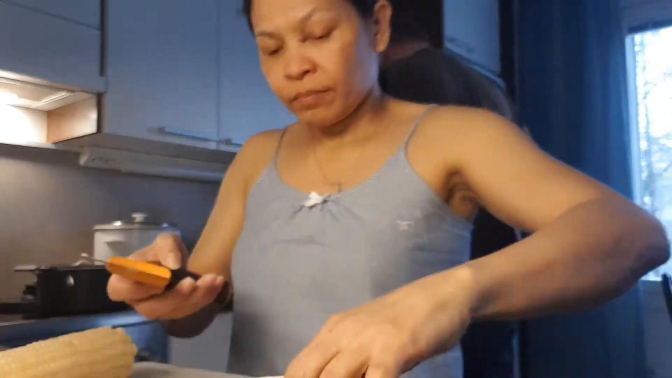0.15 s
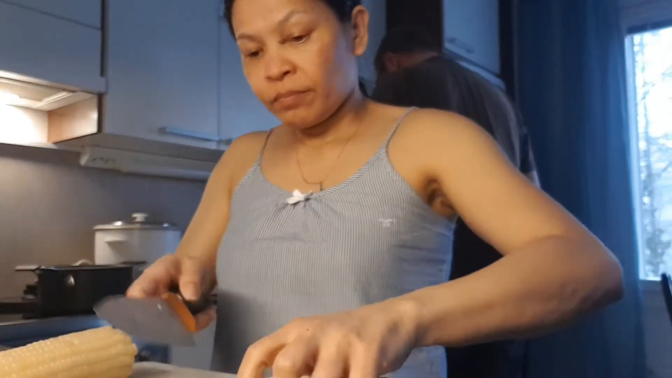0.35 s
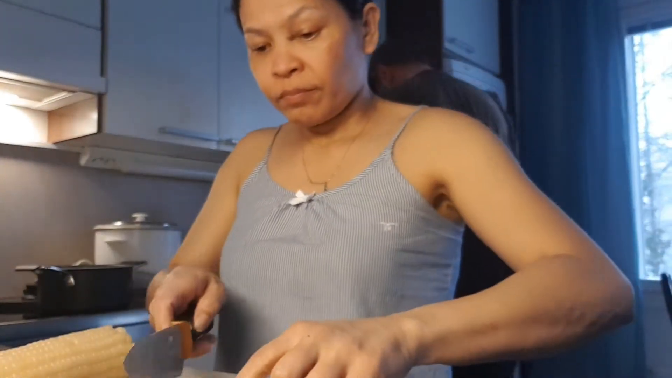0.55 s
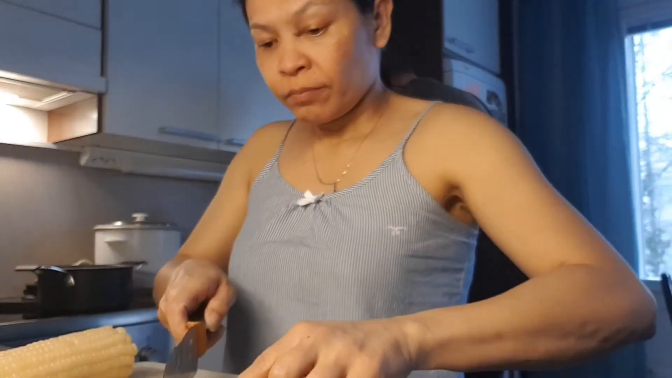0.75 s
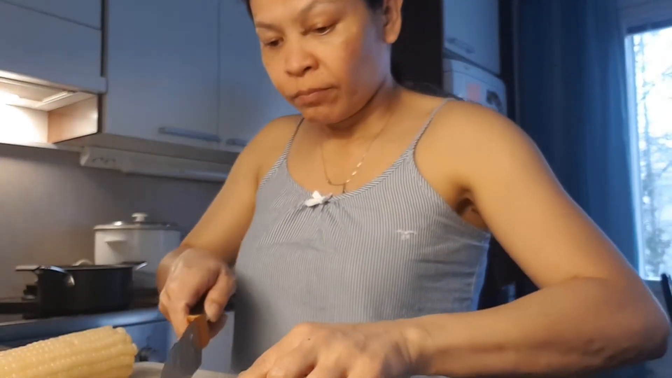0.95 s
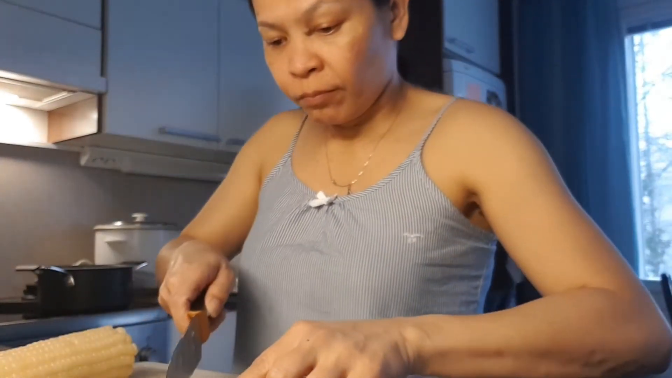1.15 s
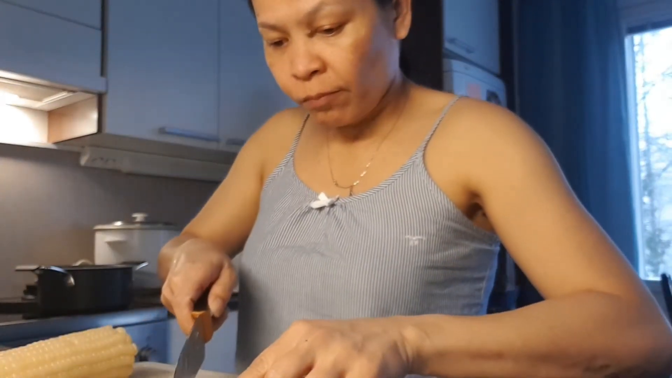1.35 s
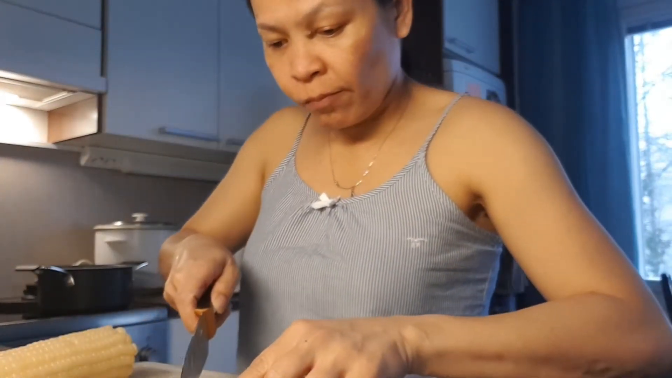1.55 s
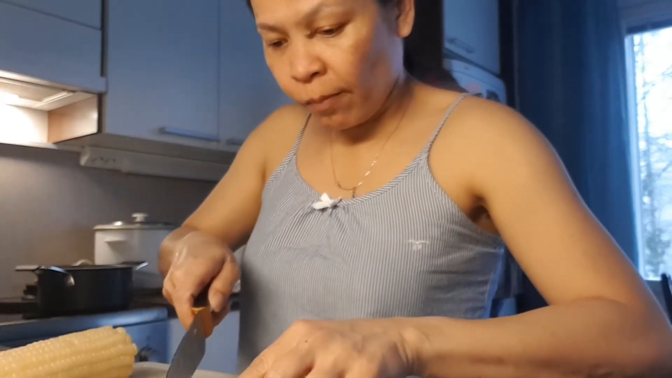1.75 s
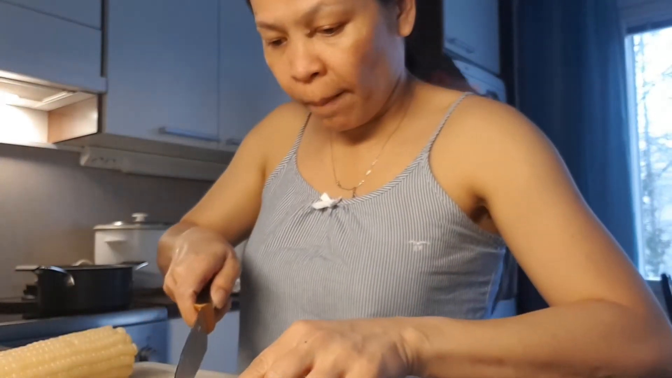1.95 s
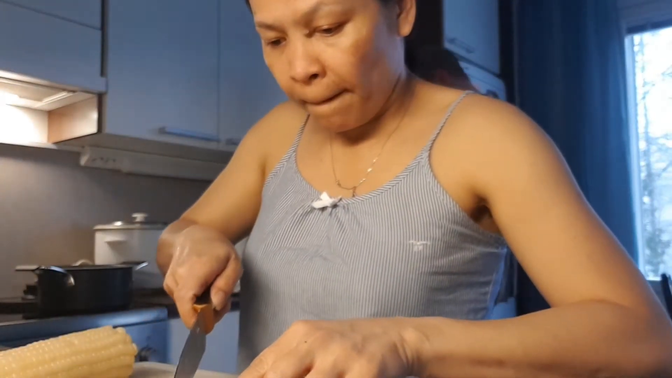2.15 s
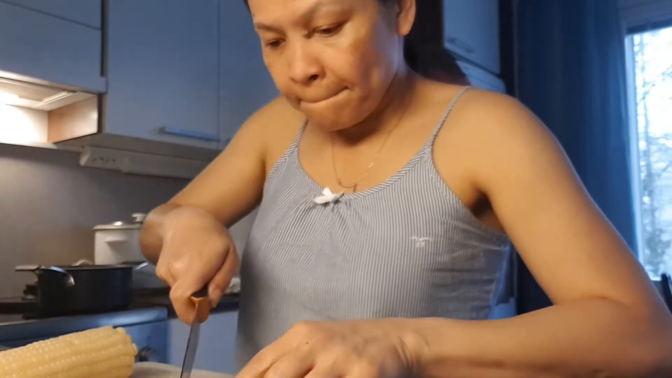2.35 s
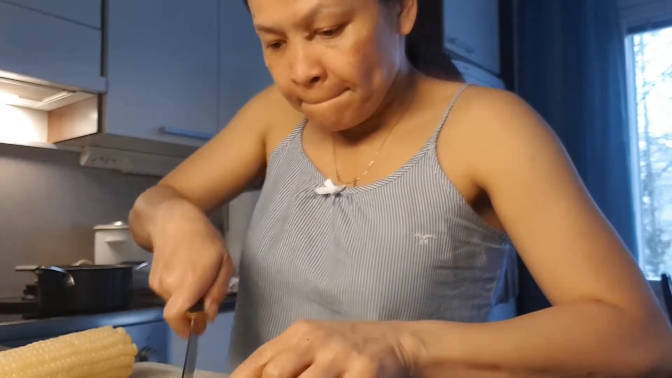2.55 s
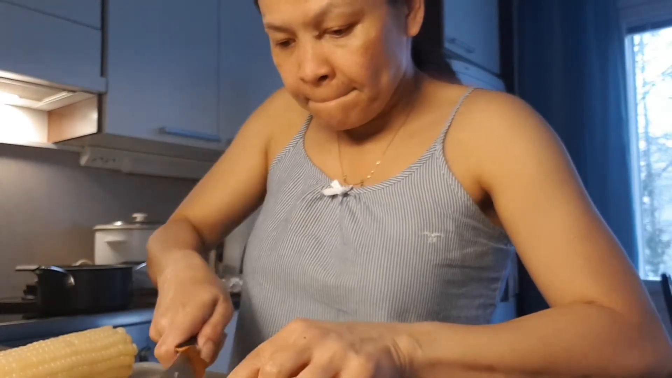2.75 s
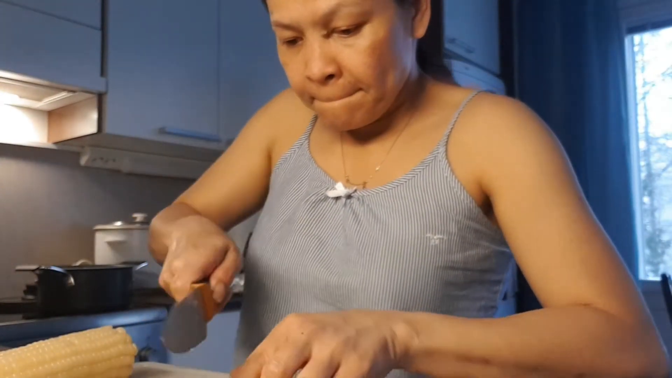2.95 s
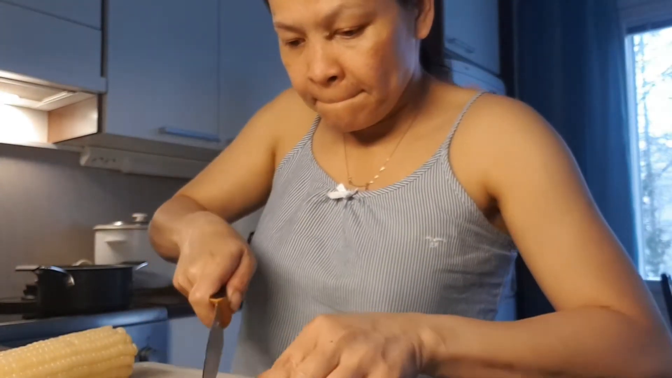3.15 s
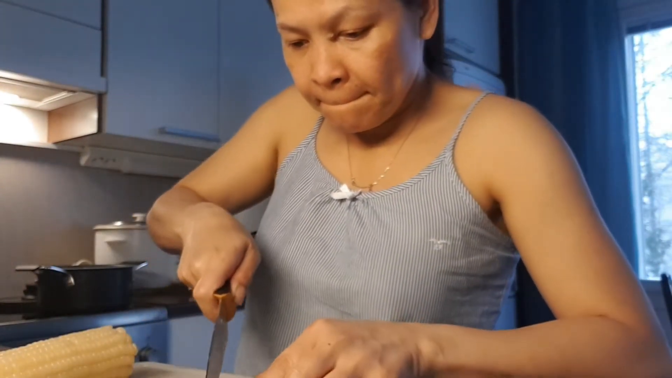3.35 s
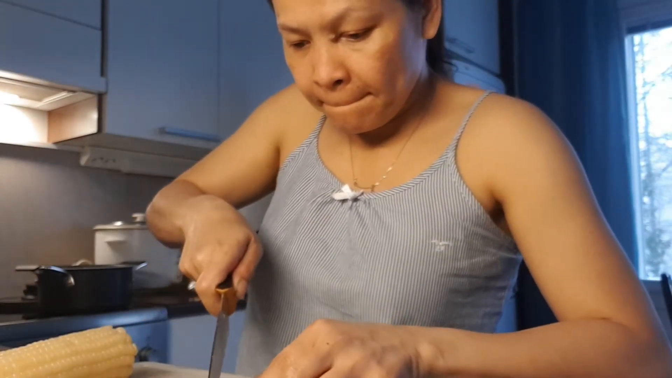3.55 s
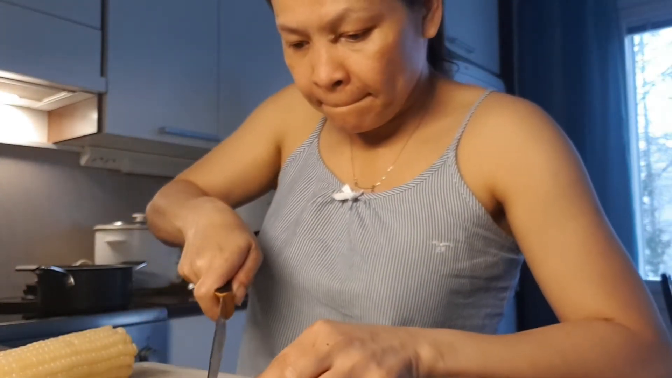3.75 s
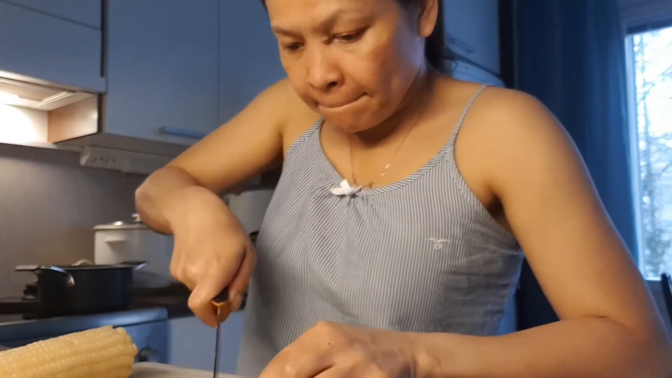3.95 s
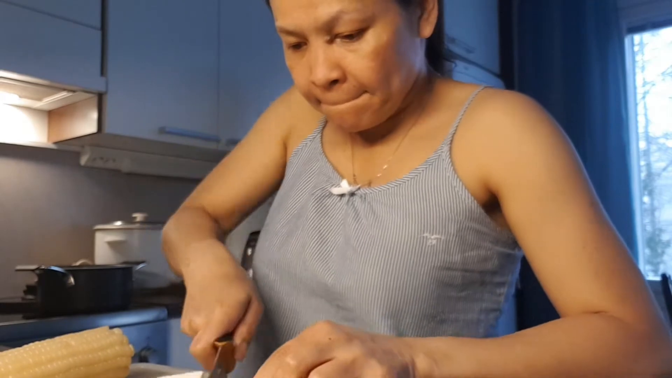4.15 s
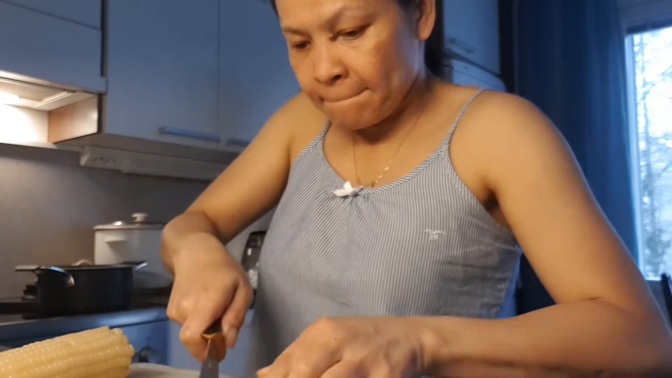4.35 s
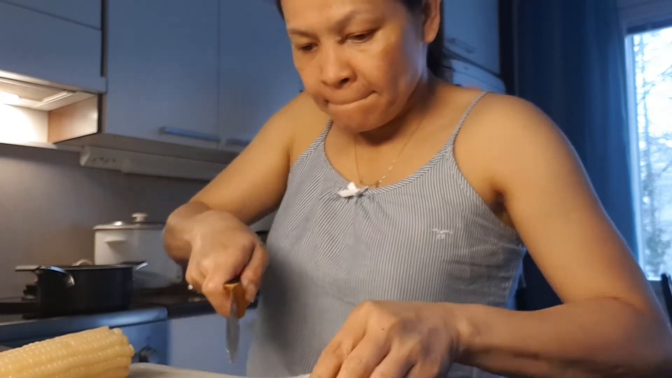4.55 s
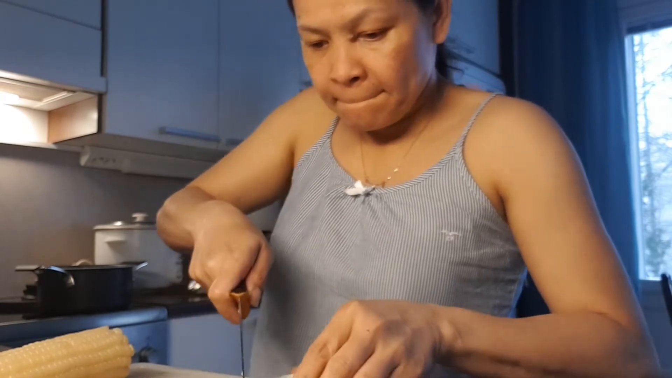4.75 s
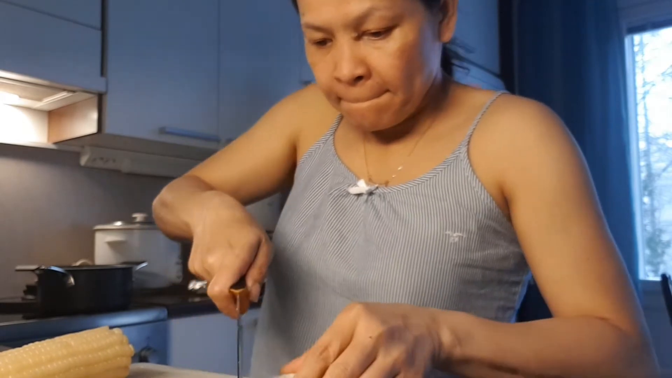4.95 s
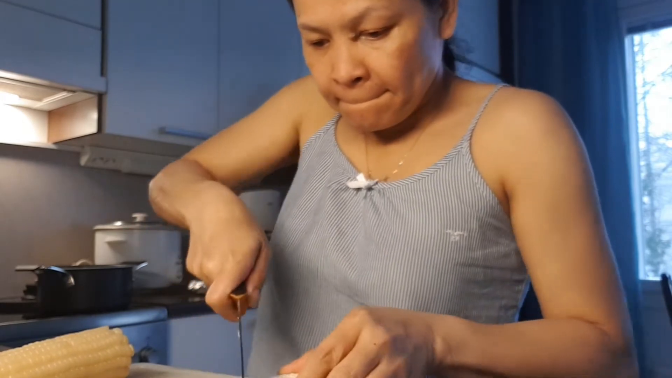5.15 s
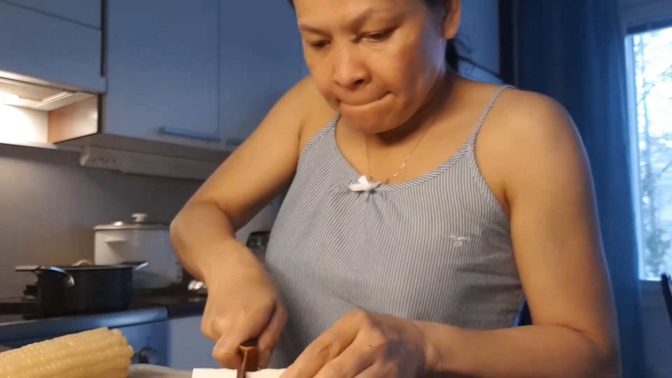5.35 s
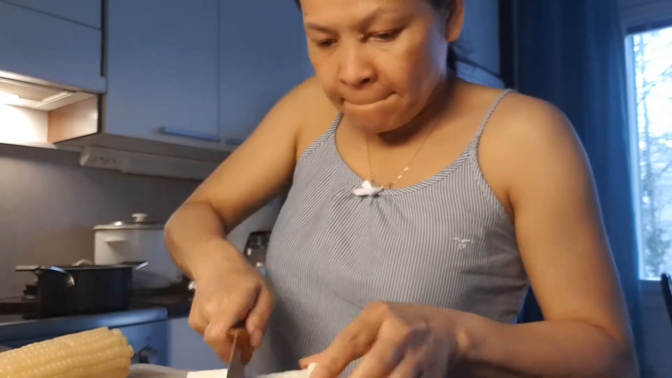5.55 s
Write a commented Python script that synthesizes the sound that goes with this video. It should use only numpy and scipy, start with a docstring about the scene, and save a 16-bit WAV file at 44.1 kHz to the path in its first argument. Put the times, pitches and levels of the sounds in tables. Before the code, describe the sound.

In a small kitchen, a blade rasps through a firm root and hits the board three times, once with a clatter.

```python
"""A large knife is worked through a hard cassava root on a cutting board in a small kitchen.
The blade, still ringing faintly, wedges into the flesh: countless cells burst in a dense tearing hiss
and fibres snap, while stick-slip friction of the rocking root makes the board thump. Three times the
knife breaks through and its impact excites the board's modes, once with a clatter. Mains hum and
a fan lie behind; they and the reverberation are ducked after the clatter, as by a noise suppressor."""
import sys
import numpy as np
from scipy import signal
from scipy.fft import rfft, irfft, next_fast_len
from scipy.io import wavfile

SR = 44100
rng = np.random.default_rng(int(sys.argv[2]) if len(sys.argv) > 2 else 0)


def unload_wav(signal):
    """Save mono or channel-first audio to the path in sys.argv[1] as 16-bit WAV at rate SR, clipped to [-1, 1]."""
    wavfile.write(
        sys.argv[1],
        SR,
        np.round(np.clip(np.atleast_2d(signal).T, -1, 1) * 32767).astype(np.int16),
    )


N = 250796
TIME = np.arange(N) / SR

# Levels are relative within each table.
# likeness of left and right noise: (frequency [Hz], correlation [1])
COHERENCE = [(30, 0.9), (170, 1), (300, 0.87), (600, 0.044), (2000, 0.037), (15000, .05)]
# a mode at two listening points: (frequency [Hz], left minus right [dB], right lag [rad])
MODE_STEREO = [(300, -10.5, .5), (496, 1, 0.69), (936, 2.5, 2.88), (1455, 1.5, 1.2), (2040, 2, 1.5),
               (4000, 7, 1.2)]
# reverberation time of the kitchen: (frequency [Hz], t60 [s])
ROOM_T60 = [(100, 0.96), (340, 0.52), (680, 0.2251), (1400, .52), (2800, 0.44), (5500, 0.56), (11000, 0.7)]
# colour of its reflections: (frequency [Hz], level [dB])
ROOM_SPECTRUM = [(60, -27.5), (200, -11), (400, 10), (700, 3.5), (1400, -4.5), (2800, -1.5), (5500, -6),
                 (11000, -12)]
# reverberation, appliance and faint steady hiss, ducked after the clatter as by a noise suppressor:
# (time [s], level [dB])
AMBIENCE = [(0, -1.5), (.7, -0.5), (3, -5.5), (4.2, -3.5), (4.4, -10.5), (4.7, -20.5), (5.05, -22.5),
            (5.35, -12.5), (5.68, -13.5)]
# mains harmonics: (frequency [Hz], level [dB])
HUM_PARTIALS = [(49.8, -54), (100, -68), (150, -59.5), (201, -52.5)]
# rush of the fan: (frequency [Hz], spectral density [dB])
FAN_SPECTRUM = [(25, -30), (50, -6), (80, -4), (120, 3.5), (170, 4.5), (240, -4), (330, -9), (600, -17.5),
                (1500, -30), (5000, -40), (9000, -43), (15000, -59)]

# modes of the free steel: (frequency [Hz], level [dB], t60 [s])
BLADE_MODES = [(1720, -70, 1.5), (1976, -64, 2.8), (2089, -65, 3.8), (5620, -76, 0.7)]
# light rubs, and the hiss dying away in the room after the clatter: (time [s], length [s], level [dB])
FAINT_HISSES = [(0.108, 0.35, -63), (.21, 0.075, -61.5), (.56, 0.062, -63), (4.2, 0.092, -55.5),
                (4.374, 0.022, -56.5), (4.478, .055, -63), (4.592, 0.025, -63.5), (4.775, 0.02, -73),
                (4.882, 0.066, -76.5), (5.179, 0.015, -66.5)]
# the root rocks on the board: (time [s], level [dB], length [s], slip rate [1/s])
ROOT_ROCKS = [(0.1, -33.5, .004, 200), (0.301, -33, 0.024, 197), (.464, -39, 0.022, 181),
              (.548, -41.5, 0.056, 185), (.68, -37.5, .011, 132), (.787, -33, 0.04, 200),
              (1.653, -28.5, 0.023, 204), (1.696, -28, 0.021, 198), (2.367, -27.5, 0.012, 181),
              (2.452, -30.5, 0.057, 181), (2.678, -30, 0.0071, 163), (3.249, -40.5, .014, 158),
              (3.863, -33.5, .024, 150), (3.93, -26.5, 0.035, 181), (4.114, -26, 0.021, 198),
              (5.132, -51, .015, 193), (5.187, -48, .012, 150), (5.534, -48, 0.018, 188)]
# modes of the board on the worktop: (frequency [Hz], level [dB], t60 [s])
WORKTOP_MODES = [(119.6, -14.5, 0.017), (163.3, 4.5, 0.074), (220, -6.5, 0.19), (234.5, -8.5, 0.12),
                 (316, -16, 0.059), (485.5, -10, 0.067)]
# shoves that shake the worktop: (time [s], level [dB], decay time [s])
WORKTOP_SHOVES = [(.55, -37, .13), (1.675, -33, 0.081), (2.62, -49.5, 0.29)]
# its shudder: (frequency [Hz], spectral density [dB])
SHUDDER_SPECTRUM = [(25, -8.5), (55, 11.5), (100, 0), (160, 3), (280, -0.5), (450, -15), (900, -23.5),
                    (3000, -70)]

# steel on the board: (time [s], level [dB], contact cut-off [Hz], most excited pitch [Hz], room feed [dB])
BOARD_KNOCKS = [(.096, -36.5, 1930, 950, 2.5), (.119, -25.5, 4500, 1860, -2.5),
                (.157, -30.5, 4500, 1870, -11), (.298, -32, 2500, 452, -5), (.56, -35.5, 2000, 1050, 5.5),
                (.785, -19, 2500, 480, -8), (1.645, -17.5, 1190, 910, 1.5), (2.6122, 4, 2490, 1250, -8.5),
                (2.6188, -7.5, 1988, 430, -4.5), (4.078, -24.5, 2520, 1581, -7.5),
                (4.111, -22, 6000, 3350, -2), (4.1596, 1.5, 3200, 1510, -1), (5.3194, -2, 4000, 1580, 0.5)]
# board and blade together: (frequency [Hz], level [dB], t60 before RING_FACTOR [s])
BOARD_MODES = [(340, -18.5, .07), (504, -12.5, 0.061), (846, -15, 0.088), (1047, -7, 0.016),
               (1165, -17, 0.065), (1325, -20.5, 0.094), (1445, -8, 0.032), (1641, -16.5, .055),
               (1708, -23.5, 0.072), (1750, -26, 0.12), (1887, -21, 0.063), (1957, -17.5, .045),
               (2320, -24.5, .03), (2370, -22, 0.026), (2829, -13.5, 0.045), (2933, -16.5, .035),
               (3284, -25, .025), (3670, -19, 0.05)]
# crack of the contact itself: (frequency [Hz], spectral density [dB])
CRACK_SPECTRUM = [(300, -23.5), (650, -19), (1100, 6.5), (1700, 5), (2250, -1.5), (2900, 2), (7000, -10),
                  (8500, -20.5), (12000, -12), (15500, -21)]
RING_FACTOR = .8
CLATTER_S, CLATTER_DB = 4.1715, 1.5   # first touch of the clatter

# bundles of fibres give way: (peak time [s], level [dB], swell time [s], decay time [s])
FIBRE_SPLITS = [(0.801, -28, 0.0031, 0.018), (1.222, -39.5, .004, .012), (1.374, -40.5, .001, 0.0065),
                (1.605, -45.5, .001, 0.006), (2.448, -40, .001, 0.0082), (2.611, -22, 0.01, 0.0033),
                (4.1331, -25.5, 0.0013, 0.013), (4.149, -24, .003, 0.0054), (5.187, -57, 0.00081, 0.016),
                (5.293, -47.5, .001, .01), (5.319, -29, 0.007, 0.0094)]
# colour of their snaps: (frequency [Hz], spectral density [dB])
SNAP_SPECTRUM = [(800, -2), (2000, -4.5), (4000, -0.5), (7000, -4), (8700, -10.5), (11000, -4.5),
                 (15500, -14.5)]
# hiss of the flesh: (frequency [Hz], spectral density [dB])
FLESH_SPECTRUM = [(260, -30), (450, -3), (745, -10), (876, -6.5), (1540, -3), (1730, -0.5), (2260, -5.5),
                  (2950, -1), (4470, 0), (6970, -2.5), (8700, -9), (10900, -4), (13400, -4), (15500, -8)]
# pushes that drive the blade deeper: (time [s], length [s], level [dB], juicy treble [dB])
KNIFE_PUSHES = [(0.633, 0.2, -39, -5.5), (0.814, .14, -44.5, -2), (1.013, 0.1, -46, 1),
                (1.191, 0.028, -44.5, -1), (1.356, .03, -51, -1.5), (1.403, 0.022, -47, 1),
                (1.613, 0.083, -55, 1), (1.746, 0.029, -47.5, -3), (1.858, .16, -42, -1.5),
                (2.167, 0.012, -53, 3), (2.315, 0.063, -55, -2.5), (2.429, 0.15, -44, -0.5),
                (2.492, 0.15, -36.5, -2), (2.644, 0.093, -39, 1), (2.776, 0.059, -38.5, 1),
                (2.917, 0.12, -49, -1.5), (3.132, 0.26, -49, -1), (3.256, 0.14, -47, 1.5),
                (3.462, 0.11, -39.5, -0.5), (3.654, 0.11, -40, -1), (3.82, 0.15, -38, -2.5),
                (4, 0.056, -48, -1.5)]


def from_db(db):
    """Amplitude grows tenfold for every 20 dB."""
    return 10 ** (np.asarray(db) / 20)


def ambience_db():
    """The ambient level moves linearly between its set points."""
    return np.interp(TIME, *np.transpose(AMBIENCE))


def at_hz(points, hz):
    """A spectrum is interpolated on a logarithmic frequency axis."""
    frequencies, values = np.transpose(points)
    return np.interp(np.log(np.maximum(hz, 1)), np.log(frequencies), values)


def panned(x, db):
    """A level difference between the channels leans a sound to the left."""
    return x * from_db(np.array([[.5], [-.5]]) * db)


def soften(x, hz, kind="low", order=2):
    """A Butterworth filter attenuates one side of its cut-off."""
    return signal.sosfilt(signal.butter(order, min(hz, .45 * SR), kind, fs=SR, output="sos"), x)


def add(out, s, sound):
    """Superposition: a sound joins the mix at time s."""
    start = max(0, round(s * SR))
    out[:, start:start + sound.shape[-1]] += sound[..., :max(0, N - start)]


def flicker(per_s):
    """Random modulation of spread about 1 glides to a new value per_s times a second."""
    steps = rng.standard_normal(2048)
    return np.interp(TIME * per_s, np.arange(len(steps)), steps)


def coloured(white, spectrum):
    """Partial coherence: two noises become a shaped stereo pair of unit power, alike only in the bass."""
    size = white.shape[-1]
    hz = np.arange(size // 2 + 1) * SR / size
    alike = np.clip(at_hz(COHERENCE, hz), -1, 1)
    mid, side = rfft(white) * from_db(at_hz(spectrum, hz))
    pair = irfft(np.sqrt(1 + alike) * mid + np.sqrt(1 - alike) * side * [[1], [-1]], size)
    return pair / np.sqrt(np.mean(pair ** 2) + 1e-20)


def noise(spectrum, grain_db=0):
    """Coloured noise turns grainy as the sizes of its tiny impulses spread by grain_db."""
    size = next_fast_len(N, True)
    grain = np.repeat(rng.standard_normal(size // 16 + 1), 16)[:size]
    white = rng.standard_normal((2, size)) * from_db(grain_db * np.minimum(grain, 3))
    return coloured(white, spectrum)[:, :N]


def stroke(s, length, db, grip_share=.34, ease_db_per_s=3, release_db_per_s=135.5):
    """A stroke's envelope rises as it grips, eases while held, then decays exponentially."""
    age = np.maximum(TIME - s, 0)
    grip = np.sqrt(np.minimum(age / (grip_share * length), 1))
    return grip * from_db(db - ease_db_per_s * age - release_db_per_s * np.maximum(age - length, 0))


def struck_mode(t, hz, t60, rise_s=0.00045):
    """A damped oscillation swells, decays and arrives a little later on the right."""
    stereo = np.array(MODE_STEREO)
    lean_db, lag = at_hz(stereo[:, [0, 1]], hz), at_hz(stereo[:, [0, 2]], hz)
    age = np.maximum(t - np.array([[0], [lag]]) / (2 * np.pi * hz), 0)
    envelope = (1 - np.exp(-age / rise_s)) * from_db(-60 * age / t60)
    return panned(envelope * np.cos(2 * np.pi * hz * age), lean_db)


def appliance():
    """Harmonics of the mains hum over the broadband rush of a fan."""
    hum = sum(np.sqrt(2) * from_db(db) * np.sin(2 * np.pi * (hz * TIME + rng.random()))
              for hz, db in HUM_PARTIALS)
    return hum + from_db(-46.0) * noise(FAN_SPECTRUM)


def kitchen(x, first_echo_s=0.005, build_s=0.00097):
    """Reverberation: diffuse reflections build up, then decay at each octave's own rate."""
    t = np.arange(int(.7 * SR)) / SR
    edges = 60 * 2.0 ** np.arange(9)
    tail = 0
    for low, high in zip(edges, edges[1:]):
        hz = np.sqrt(low * high)
        octave = signal.butter(3, [low, high], "band", fs=SR, output="sos")
        band = signal.sosfilt(octave, rng.standard_normal((2, len(t))))
        tail = tail + band * from_db(at_hz(ROOM_SPECTRUM, hz) - 60 * t / at_hz(ROOM_T60, hz))
    onset = np.clip((t - first_echo_s) / build_s, 0, 1)
    return signal.fftconvolve(x, tail * onset * from_db(-26.5), axes=-1)[:, :N]


def blade_ring(contact_s=.58, damping_s=.03):
    """Free vibration: the lifted blade sings on until contact with the root damps it."""
    steel = sum(from_db(db + 2.5 * flicker(70)) * struck_mode(TIME, hz, t60)
                for hz, db, t60 in BLADE_MODES)
    return steel * np.exp(-np.maximum(TIME - contact_s, 0) / damping_s)


def thin_tone(centre_hz=976):
    """A faint, brief tone wavers by random frequency modulation."""
    hz = centre_hz + 7 * flicker(70)
    return stroke(s=.22, length=0.075, db=-58.5) * np.sin(2 * np.pi * np.cumsum(hz) / SR)


def faint_hiss():
    """Light sliding friction, and the hiss dying in the room after the clatter, rise above a noise floor."""
    floor = from_db(-73 + .75 * ambience_db())
    swells = np.max([stroke(*row) for row in FAINT_HISSES], axis=0)
    return noise(FLESH_SPECTRUM, grain_db=1.5) * np.maximum(floor, swells)


def shudder():
    """Each shove sets off a low random vibration of the worktop that decays exponentially."""
    envelope = sum(from_db(db) * (TIME >= s) * np.exp(-np.maximum(TIME - s, 0) / decay_s)
                   for s, db, decay_s in WORKTOP_SHOVES)
    return soften(noise(SHUDDER_SPECTRUM) * envelope, 900)


def thumps(force, creep_per_s=30, creep_db=-4, knock_db=-22.5, contact_hz=400, radiation_hz=105):
    """Stick-slip of the root, and the knocks, drive the low modes of the board on the worktop."""
    impulses = (rng.random(N) < creep_per_s / SR) * force * from_db(creep_db)   # small random slips
    for s, db, length, per_s in ROOT_ROCKS:
        ages = np.arange(0, length, 1 / per_s)
        impulses[np.round((s + ages) * SR).astype(int)] += from_db(db) * (1 - .5 * ages / length)
    for s, db, *_ in [*BOARD_KNOCKS, (CLATTER_S, CLATTER_DB)]:
        impulses[round(s * SR)] += from_db(db + knock_db)
    t = np.arange(SR // 4) / SR
    boom = sum(from_db(db - 60 * t / t60) * np.sin(2 * np.pi * hz * t) for hz, db, t60 in WORKTOP_MODES)
    groan = soften(signal.fftconvolve(impulses, boom)[:N], contact_hz)
    groan = soften(groan, radiation_hz, "high")   # a small board radiates little deep bass
    return panned(groan, -.5) * from_db(-3.5)


def rebounds(touches=3, gap_s=.0027, spread=.15):
    """Inelastic impact: in each knock the edge bounces at uneven gaps, weaker every time."""
    rows = []
    for s, db, *contact in BOARD_KNOCKS:
        gaps = gap_s * (1 + spread * rng.uniform(-1, 1, touches))
        loss_db = 9 - .2 * db   # lighter knocks lose more
        rows += [(s + gaps[:k].sum(), db - k * loss_db, *contact) for k in range(touches)]
    return rows


def clatter(touches=5, gap_s=.0052, loss_db=2.17, contact_hz=3200, tip_hz=2500, heel_hz=1250):
    """Damped rocking: tip and heel strike in turn, each exciting its own pitch most."""
    room_db = 0.5
    return [(CLATTER_S + k * gap_s, CLATTER_DB - k * loss_db, contact_hz,
             heel_hz if k % 2 else tip_hz, room_db) for k in range(touches)]


def knocks(focus_db=9.0, crack_db=-15.0, crack_s=0.005, bass_share=.36, detune=0.011):
    """Impacts crack and ring the board's modes, weighted by where they land: direct sound, room feed."""
    direct, feed = np.zeros((2, 2, N))
    t = np.arange(SR // 4) / SR
    for s, db, contact_hz, favoured_hz, room_db in rebounds() + clatter():
        crack = coloured(rng.standard_normal((2, len(t))), CRACK_SPECTRUM)
        blow = panned(crack, 3.1) * from_db(crack_db) * np.exp(-t / crack_s)
        for hz, mode_db, t60 in BOARD_MODES:
            octaves_off = min(abs(np.log2(hz / favoured_hz)), 1.7)
            detuned_hz = hz * (1 + detune * rng.standard_normal())   # so repeats sound less tonal
            ring = struck_mode(t, detuned_hz, t60 * RING_FACTOR)
            blow += from_db(mode_db - focus_db * octaves_off) * ring
        blow = soften(blow, bass_share * favoured_hz, "high")   # a high blow barely bends the board
        blow = soften(blow, contact_hz, order=1) * from_db(db + 3.5)
        add(direct, s, blow)
        add(feed, s, blow * from_db(room_db))
    return direct, feed


def effort():
    """The strongest push sets the driving force on the blade and the fizz of the juicy flesh."""
    force, juice = np.zeros((2, N))
    for s, length, db, treble_db in KNIFE_PUSHES:
        push = stroke(s, length, db)
        force = np.maximum(force, push)
        juice = np.maximum(juice, push * from_db(treble_db))
    return force, juice


def splitting(force, fibres_per_s=76, fibre_db=2, fibre_decay_s=0.0012):
    """Brittle fracture: fibre bundles fail in runs that swell to a snap; single fibres tick under load."""
    snaps = soften(noise(SNAP_SPECTRUM, grain_db=6.0), 640, "high")
    runs = sum(from_db(db) * np.exp(-np.maximum((s - TIME) / swell_s, (TIME - s) / decay_s))
               for s, db, swell_s, decay_s in FIBRE_SPLITS)
    breaks = (rng.random(N) < fibres_per_s / SR) * force * from_db(fibre_db)
    ticks = signal.lfilter([1], [1, -np.exp(-1 / (fibre_decay_s * SR))], breaks + 1e-18)
    return panned(snaps * (runs * from_db(-0.5) + ticks), .8)


def tearing(force, juice):
    """Cells bursting along the wedge sum incoherently to a hiss; juicier stretches fizz higher."""
    cells = soften(noise(FLESH_SPECTRUM, grain_db=1.5), 420, "high")
    fizz = panned(soften(cells, 8740, "high") * juice, db=1.5)
    body = panned(soften(cells, 6900) * force, db=5)
    catching_db = 1.2 * flicker(130) + 0.31 * flicker(30)   # the wedge advances unevenly
    return (body - fizz) * from_db(catching_db + 3.0)


def scene():
    """The direct sound of knife, root and board adds to the diffuse field of the kitchen."""
    knock_direct, knock_feed = knocks()
    force, juice = effort()
    near = tearing(force, juice) + splitting(force) + faint_hiss()
    near += thumps(force) + shudder() + blade_ring() + thin_tone()
    far = kitchen(knock_feed + from_db(-5.5) * near) + appliance()
    return near + knock_direct + far * from_db(ambience_db())


def record(dry, cutoff_hz=15800):
    """Soft saturation rounds the loudest peaks; a steep low-pass cuts the top."""
    rounded = 1.302 * np.tanh(dry / 1.101)
    return signal.sosfilt(signal.ellip(10, .1, 80, cutoff_hz, fs=SR, output="sos"), rounded)


dry = scene()
out = record(dry)
unload_wav(out)
```